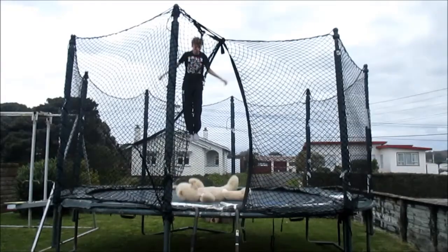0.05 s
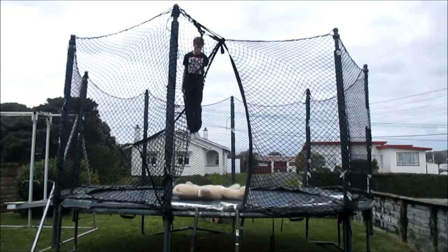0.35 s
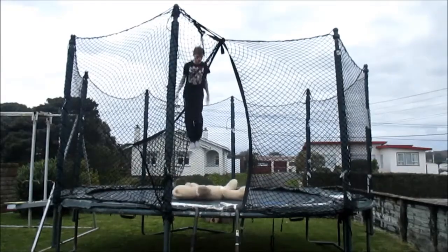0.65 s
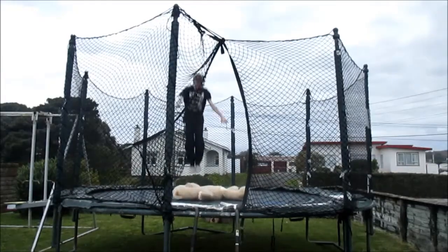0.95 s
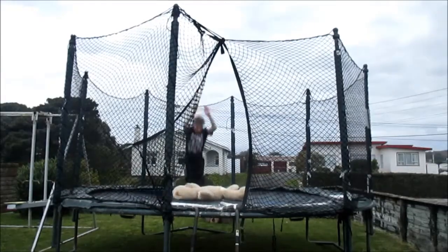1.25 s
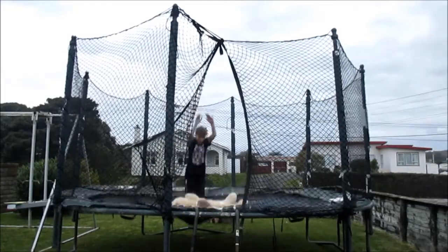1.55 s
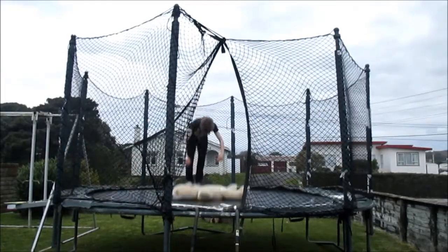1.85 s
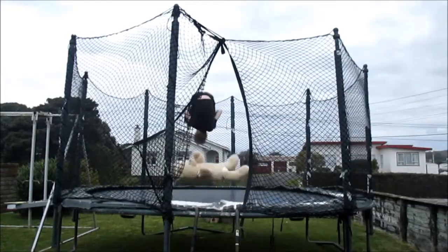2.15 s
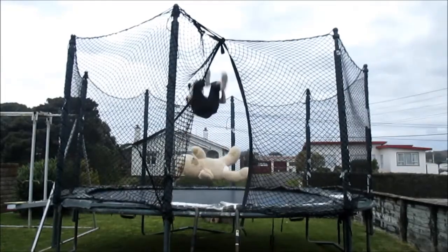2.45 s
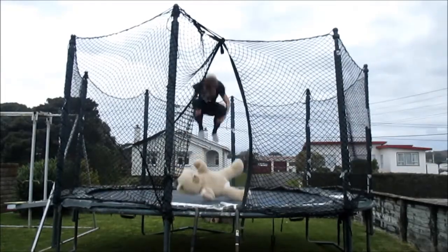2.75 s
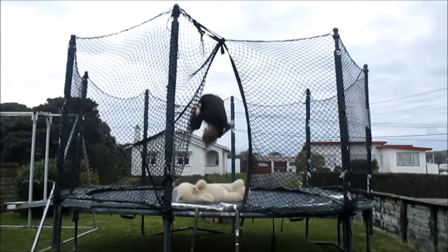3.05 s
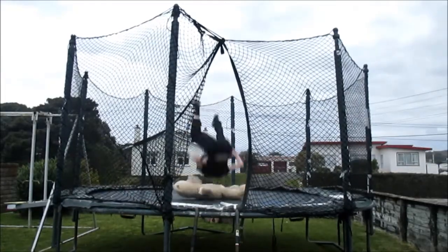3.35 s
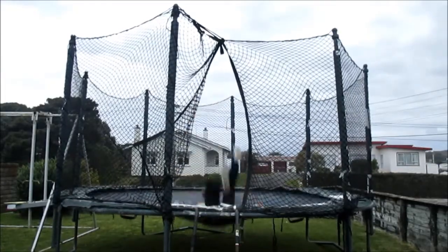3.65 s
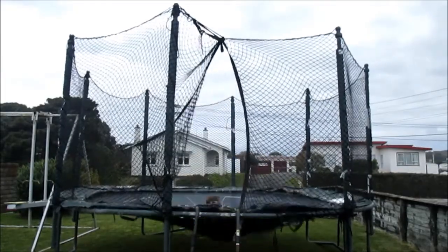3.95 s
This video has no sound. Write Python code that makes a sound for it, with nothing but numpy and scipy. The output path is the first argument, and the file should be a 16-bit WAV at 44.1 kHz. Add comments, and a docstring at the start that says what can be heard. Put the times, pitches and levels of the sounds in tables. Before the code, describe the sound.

Someone lands twice on a netted trampoline in a garden. Each landing swishes the mat, thuds and leaves the springs and frame rattling and creaking. The second is heavier and overloads the nearby microphone, which also catches wind rumble.

```python
"""In a garden, someone lands twice on a netted trampoline, a few metres from a small camera.
Each landing swishes the mat, clanks the steel frame and leaves the springs and net rattling.
Hooks creak as they slip, and single springs sing out. The plunging mat shoves air at the microphone,
which thuds and overloads. Wind buffets the microphone over a distant outdoor rush."""
import sys
import numpy as np
from scipy import signal
from scipy.fft import rfft, irfft
from scipy.io import wavfile
from scipy.ndimage import uniform_filter1d

SR = 44100
rng = np.random.default_rng(int(sys.argv[2]) if len(sys.argv) > 2 else 0)


def to_wav(s):
    """Save 16-bit WAV."""
    ch = np.atleast_2d(s).T  # columns
    pcm = np.round(np.clip(ch, -1, 1) * 32767)  # PCM
    wavfile.write(sys.argv[1], SR, pcm.astype(np.int16))


N = 176400
T = np.arange(N) / SR
AGE = T[:SR // 2]  # seconds since a knock, as long as it rings

# A colour says how strong the low and high parts of a sound are. Each row: frequency in Hz, level in dB.
GARDEN_COLOUR = [(22, -29.5), (38, 5), (66, -2), (178, -3.5), (210, -3.5), (329, -9.5), (407, -13.5),
                 (448, -12.5), (624, -19.5), (754, -21), (1300, -28), (1650, -35.5), (4570, -43.5),
                 (7350, -50.5), (11000, -71), (14300, -101), (22000, -120)]  # distant rush
WIND_COLOUR = [(10, -12.5), (25, 0), (45, -4.5), (75, -12), (130, -38.5), (400, -39.5), (2000, -68.5)]  # wind on the microphone
STEEL_COLOUR = [(200, -20), (900, -9), (1300, 3.5), (2000, 0), (3600, -0.5), (5200, -3.5), (7000, -12),
                (9000, -25), (10500, -44.5), (11500, -64)]  # clattering steel
EDDY_COLOUR = [(30, -33), (150, 8), (350, -0.5), (700, 0), (1400, -10), (3000, -18), (6000, -32),
               (11000, -56)]  # swirling air
MAT_COLOUR = [(60, -9), (180, 3.5), (320, 0), (420, -3), (620, -3), (850, -7), (1200, -9.5), (2000, -21),
              (4000, -26.5), (9000, -64.5)]  # rustling mat
SLAP_COLOUR = [(200, 1), (700, 6), (1400, 9), (3000, -10), (6000, -26), (11000, -35)]  # crack of the heaviest landing
HISS_COLOUR = [(1500, -22), (4000, 5.5), (6500, -2.5), (9000, -14), (11500, -38)]  # microphone hiss
# Wind gusts. Each row: peak time in seconds, level in dB, width in seconds.
GUSTS = [(.105, -16.5, 0.022), (0.172, -18, 0.018), (0.337, -21, 0.014), (.6, -25, 0.088),
         (.66, -35, 0.023), (0.931, -27.5, 0.034), (1.3, -31.5, 0.12), (1.66, -33, 0.051), (1.96, -32, 0.1),
         (3.551, -29.5, 0.085), (3.958, -16.5, 0.017)]
# How hard the springs and net shake. Each row: time in seconds, level in dB.
SHAKE = [(1.05, -72), (1.24, -56), (1.31, -56), (1.39, -35), (1.52, -43), (1.6, -39), (1.74, -44.5),
         (1.83, -44), (1.98, -48.5), (2.07, -49.5), (2.22, -57.5), (2.3, -53.5), (2.45, -59), (2.85, -62),
         (3.6, -70), (3.67, -50), (3.78, -46), (3.84, -38), (3.91, -34.5), (4, -47)]
# Tones of a steel tube. Each row: pitch in Hz, level in dB, fade time (to fall 60 dB) in seconds.
TUBE_TONES = [(1247, -8.5, 0.71), (1228, -6, 0.64), (1270, -11, 0.26), (1356, -7, 0.14), (1477, -10, 0.64),
              (1565, 0.5, 0.21), (1640, -8.5, 0.47), (2486, -3, 0.16), (2830, -12.5, 0.3),
              (3380, -10, 0.22), (3460, -8, 0.2), (4040, -8.5, 0.18), (5170, -12, 0.36), (5460, -19, 0.31),
              (5800, -13, 0.25)]
# Air shoved at the microphone. Each row: start in seconds, level in dB, pitch in Hz,
# swell time in seconds, swirl in dB relative to the thud.
THUDS = [(1.187, -18, 188, 0.0019, -20), (1.548, -15.5, 74.4, 0.0064, -11),
         (1.568, -11.5, 113, 0.0048, -27), (1.5736, -14, 234, 0.0031, -12), (1.606, -19.5, 31, 0.018, -25),
         (1.664, -24.5, 106, 0.0072, -3.5), (1.762, -24, 37, 0.021, -10.5), (3.7814, -5.5, 74, 0.0038, -35),
         (3.779, -7.5, 29.2, 0.02, -23.5), (3.928, -0.5, 73, 0.0073, -15)]
# The sharpest blasts of air. Each row: peak time in seconds, level in dB, width in seconds.
BLASTS = [(1.564, -41, 0.0016), (1.615, -24, 0.0043), (3.938, -6.5, 0.0042), (3.955, -24.5, 0.0077)]
# Stretches of the mat. Each row: peak time in seconds, level in dB, rise and release in seconds.
STRETCHES = [(1.41, -35.5, 0.15, 0.15), (1.571, -23, 0.032, 0.077), (1.85, -37.5, 0.083, 0.14),
             (2.29, -40, 0.12, 0.14), (3.687, -40.5, 0.052, 0.081), (3.872, -26, 0.023, 0.027),
             (3.929, -21, 0.015, 0.03)]
# Knocks in the frame joints. Each row: start in seconds, level in dB, tube ring in dB relative to
# the knock, brightness in dB per octave, fade time of the clatter in seconds.
CLANKS = [(1.2606, -37.5, -16, 5, 0.044), (1.282, -49.5, -20, 7, 0.14), (1.3177, -28.5, -10.5, -1, 0.75),
          (1.332, -26.5, -20, -2, 0.099), (1.376, -23.5, -8, 1, 0.16), (1.482, -40, -23, 4, .07),
          (1.554, -40, -17, 3, 0.4), (1.609, -39, -12, 2, 0.1), (1.782, -44, -27, 2.5, 0.36),
          (1.9595, -42, -16, -2, 0.025), (2.006, -45, -20, -4, 0.63), (2.3064, -49.5, -11, 0, 0.13),
          (2.503, -45.5, -9, -3, 0.33), (2.6089, -41, -19, -10.5, 0.23), (3.583, -42.5, -34, -6, 0.077),
          (3.7865, -39, -34, 5.5, 0.36), (3.808, -33.5, -27, 1.5, 0.18), (3.829, -35.5, -6.5, 4, 0.11),
          (3.855, -35, -27, -8.5, 0.16), (3.884, -32, -10, 3.5, 0.11)]
# Spring hooks slipping under load. Each row: start in seconds, level in dB, length in seconds.
CREAKS = [(1.336, -36, .022), (1.3675, -27.5, .018), (1.397, -33, .016), (1.424, -34, .018),
          (3.866, -33, .008), (3.8845, -24.5, .017)]
# Tones of a slipping hook. Each row: pitch in Hz, level in dB, fade time in seconds.
HOOK_TONES = [(1225, 1, .09), (1305, -1, .06), (3360, -1, .04), (3470, 0, .06), (4020, -10, .03),
              (5300, -13, .025), (6500, -15, .02)]
# Springs that ping, squeal or groan. Each row: start in seconds, pitch in Hz, glide in Hz per second,
# level in dB, fade time in seconds, roughness from 0 to 1.
PINGS = [(1.812, 5380, 600, -43.5, .24, 1), (1.813, 6250, 0, -49, .1, 1), (1.9585, 3050, 0, -38, .04, 1),
         (2.506, 3150, 0, -45, .16, .8), (2.63, 1460, 0, -46, .45, .3), (3.7425, 4950, 9000, -39, .12, 1),
         (3.809, 5200, 0, -36, .06, 1), (3.872, 420, 0, -28, .22, .7)]


def amp(db):
    return 10 ** (np.asarray(db) / 20)


def unit(x):
    return x / np.sqrt(np.mean(x ** 2))


def convolve(a, b):
    return signal.oaconvolve(a, b)[:len(a)]


def noise(size=N):
    return rng.standard_normal(size)


def decay(fade_s):
    """A fade that falls 60 dB in fade_s seconds."""
    return np.exp(-np.log(1000) * AGE / fade_s)


def hump(at, db, width):
    """A smooth rise and fall in level."""
    return amp(db) * np.exp(-.5 * ((T - at) / width) ** 2)


def add(out, start, sound):
    """Mix a sound in from its start time."""
    part = out[int(start * SR):][:len(sound)]
    part += sound[:len(part)]


def colour(x, points, tilt_db=0):
    """Give a sound a colour, tilted by tilt_db per octave; white noise keeps its power."""
    hz, db = np.array(points, float).T
    octave = np.log2(np.maximum(np.fft.rfftfreq(2 ** 14, 1 / SR), 1))
    curve = np.interp(octave, np.log2(hz), db + tilt_db * np.log2(hz))
    curve -= 20 * np.maximum(octave - np.log2(hz[-1]), 0)
    # build a filter that never sounds ahead of its input
    cepstrum = irfft(np.log(amp(curve)))
    cepstrum[1:] *= 2
    cepstrum[len(cepstrum) // 2:] = 0
    response = irfft(np.exp(rfft(cepstrum)))
    return convolve(x, response / np.linalg.norm(response))


def wander(per_s):
    """A smooth random drift, mostly between -1 and 1."""
    hold = int(SR / per_s)
    steps = np.repeat(noise()[:N // hold + 1], hold)
    return np.sqrt(2) * uniform_filter1d(uniform_filter1d(steps, hold), hold)[:N]


def clicks(per_s, spread_db, size=N):
    """Random clicks of uneven size."""
    hits = (rng.random(size) < per_s / SR) * np.sign(noise(size))
    return unit(hits * amp(spread_db * np.clip(noise(size), -2, 2)))


def ring(tones):
    """The fading tones of a struck object."""
    return sum((-1) ** k * amp(db) * np.sin(2 * np.pi * hz * AGE) * decay(fade_s)
               for k, (hz, db, fade_s) in enumerate(tones))


def detuned(tones, damping=1, pitch_spread=.013):
    """No two tubes or springs are alike: each tone is a little higher or lower, louder or softer."""
    chance = rng.standard_normal((len(tones), 2))
    return [(hz * (1 + pitch_spread * higher), db + 2 * louder, fade_s / damping)
            for (hz, db, fade_s), (higher, louder) in zip(tones, chance)]


def garden(level_db=-38):
    """A distant outdoor rush wavers a little."""
    waver_db = 0.33 * wander(2.5) + 0.9 * wander(14)
    return amp(level_db + waver_db) * colour(noise(), GARDEN_COLOUR)


def wind(top_hz=57):
    """Gusts rumble on the microphone."""
    gusts = sum(hump(*gust) for gust in GUSTS)
    swirl = signal.hilbert(colour(noise(), WIND_COLOUR))
    rumble = unit(swirl.real / np.abs(swirl) ** .5)  # partly evens out the loudness
    return signal.sosfilt(signal.butter(4, top_hz, fs=SR, output="sos"), gusts * rumble)


def springs(count=6, ticks_per_s=420):
    """Hooks and net clips tick as the frame shakes; each spring rings briefly at its own pitches."""
    shake = amp(np.interp(T, *np.array(SHAKE).T) + 1.3 * wander(35.51))
    ticks, ringing = np.zeros(N), np.zeros(N)
    for _ in range(count):
        own_ticks = shake * clicks(ticks_per_s / count, spread_db=4) / np.sqrt(count)
        tones = ring(detuned(TUBE_TONES, damping=2))
        ticks += own_ticks
        ringing += convolve(own_ticks, tones / np.linalg.norm(tones))
    coil = noise(len(AGE)) * decay(fade_s=.08)
    rattle = .5 * ticks + 0.77 * convolve(ticks, coil / np.linalg.norm(coil))
    return colour(rattle, STEEL_COLOUR, tilt_db=-2) + amp(-8.5) * ringing


def squeak(hz=2540):
    """A faint, wavering squeak comes just before the first landing."""
    pitch = hz * (1 + 0.026 * wander(270))
    return hump(at=1.18, db=-63.5, width=.07) * np.sin(2 * np.pi * np.cumsum(pitch) / SR)


def thuds():
    """Air from the plunging mat swings the pressure at the microphone and breaks into swirls."""
    swing, stir = np.zeros(N), np.zeros(N)
    for start, db, hz, swell, swirl_db in THUDS:
        age = np.maximum(T - start, 0)
        push = amp(db) * age / swell * np.exp(1 - age / swell)
        swing += push * np.sin(2 * np.pi * hz * age)
        stir += push * amp(swirl_db)
    swirls = colour(stir * noise(), EDDY_COLOUR, tilt_db=-3)
    blasts = sum(hump(*blast) for blast in BLASTS)
    return swing + swirls + colour(blasts * noise(), EDDY_COLOUR)


def mat():
    """The woven mat and padding rustle as they stretch and let go."""
    strain = sum(amp(db) * np.exp(-np.maximum((at - T) / rise, (T - at) / release))
                 for at, db, rise, release in STRETCHES)
    rustle = 0.89 * noise() + 0.64 * clicks(per_s=640, spread_db=9.8)
    return colour(strain * rustle, MAT_COLOUR)


def frame(rise_s=.0023, bounce_s=.016):
    """Each knock chatters in a joint, sets the springs clattering and rings a different tube."""
    out, rise = np.zeros(N), 1 - np.exp(-AGE / rise_s)
    for start, db, ring_db, bright_db, fade_s in CLANKS:
        bounces = clicks(per_s=570, spread_db=2.1, size=len(AGE))
        chatter = bounces * np.exp(-AGE / bounce_s) * decay(2 * fade_s)
        clatter = noise(len(AGE)) * decay(fade_s)
        knock = colour(rise * (0.53 * chatter + 0.8 * clatter), STEEL_COLOUR, bright_db)
        tube = amp(ring_db) * ring(detuned(TUBE_TONES))
        add(out, start, amp(db) * (knock + tube))
    return out


def hooks(release_s=.012):
    """Hooks stick and slip on the frame in short bursts, each ringing the same metal tones."""
    out, tones = np.zeros(N), ring(HOOK_TONES)
    for start, db, length in CREAKS:
        since_end = np.maximum(T - start - length, 0)
        grip = (T >= start) * amp(-60 * since_end / release_s)
        creak = convolve(clicks(per_s=1000, spread_db=1) * grip, tones)
        out += amp(db) * creak / np.sqrt(np.sum(creak ** 2) / (length * SR))
    return out


def pings(rise_s=.0015, waver=.012, scrape_db=-5):
    """Now and then a spring sings a rough, scraping tone that may rise as it tightens."""
    out, size = np.zeros(N), len(AGE)
    rise = 1 - np.exp(-AGE / rise_s)
    for start, hz, glide, db, fade_s, rough in PINGS:
        pitch = (hz + glide * AGE) * (1 + rough * waver * wander(900)[:size])
        flutter = 0.91 + 0.51 * rough * wander(250)[:size]
        tone = flutter * np.sin(2 * np.pi * np.cumsum(pitch) / SR)
        near_pitch = [(hz / 10, -30), (.7 * hz, -16), (hz, 0), (1.3 * hz, -14), (2 * hz, -42)]
        scrape = rough * amp(scrape_db) * colour(noise(size), near_pitch)
        add(out, start, amp(db) * rise * decay(fade_s) * (tone + scrape))
    return out


def slap(start=3.9372, db=-19, fade_s=.029):
    """A sharp crack as the heaviest landing overloads the microphone."""
    out = np.zeros(N)
    add(out, start, amp(db) * colour(noise(len(AGE)) * decay(fade_s), SLAP_COLOUR))
    return out


def scene():
    """The trampoline, wind and garden mix into one channel."""
    metal = frame() + springs() + pings() + hooks() + squeak()
    return (metal + mat() + thuds() + slap() + wind() + garden())[None]


def record(dry, hiss_db=-70, top_hz=11500):
    """The camera adds hiss, cuts the highest sounds and overloads on the hardest thud."""
    hiss = amp(hiss_db) * colour(noise(), HISS_COLOUR)
    dulled = signal.sosfilt(signal.ellip(8, .2, 70, top_hz, fs=SR, output="sos"), dry + hiss)
    clipped = np.clip(dulled, -1, 1)
    return signal.sosfilt(signal.ellip(8, .2, 70, 16000, fs=SR, output="sos"), clipped)


dry = scene()
out = record(dry)
to_wav(out)
```